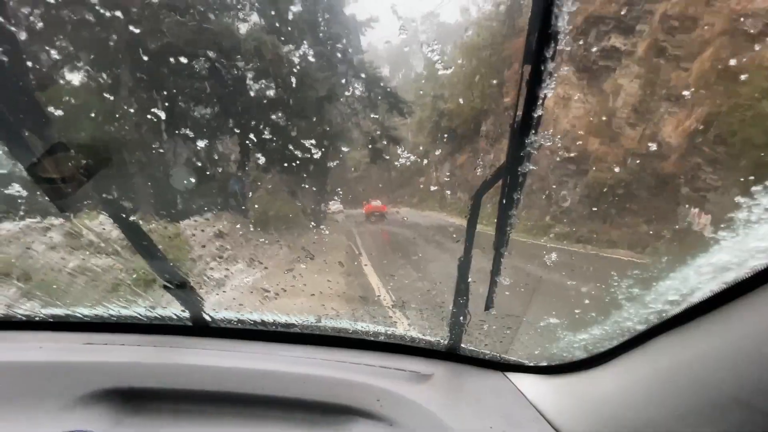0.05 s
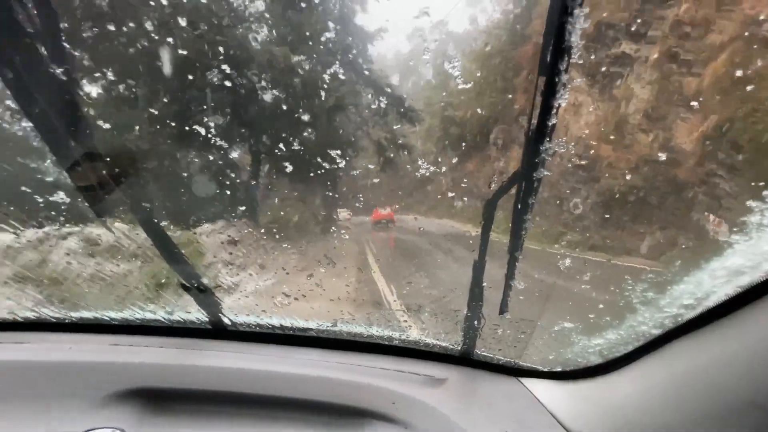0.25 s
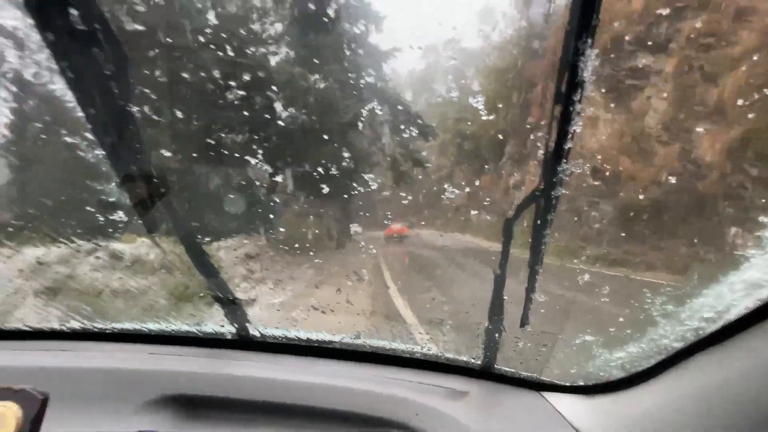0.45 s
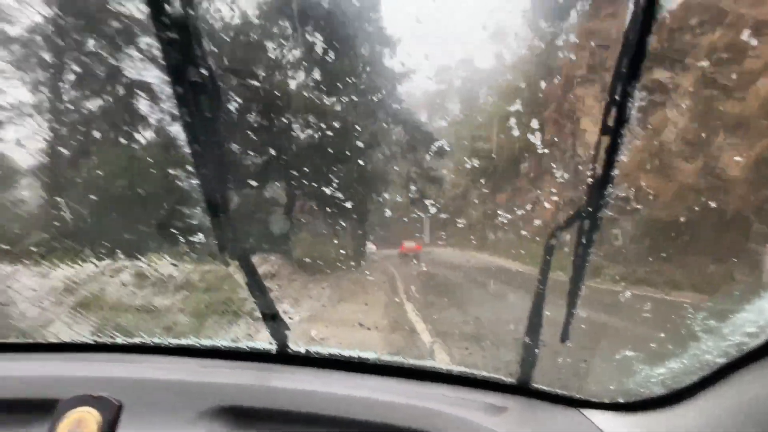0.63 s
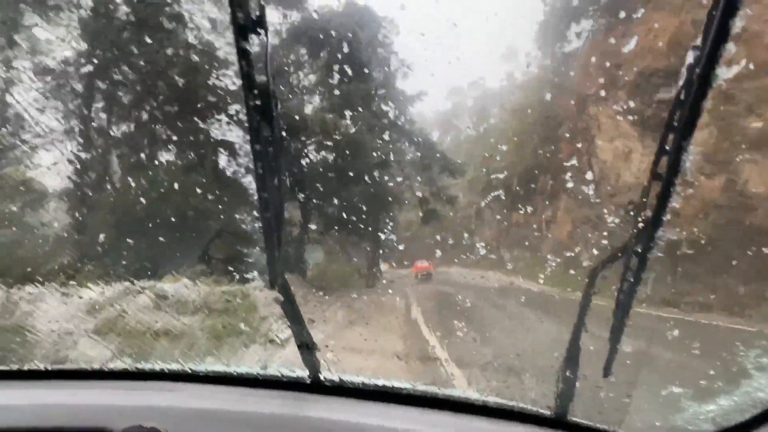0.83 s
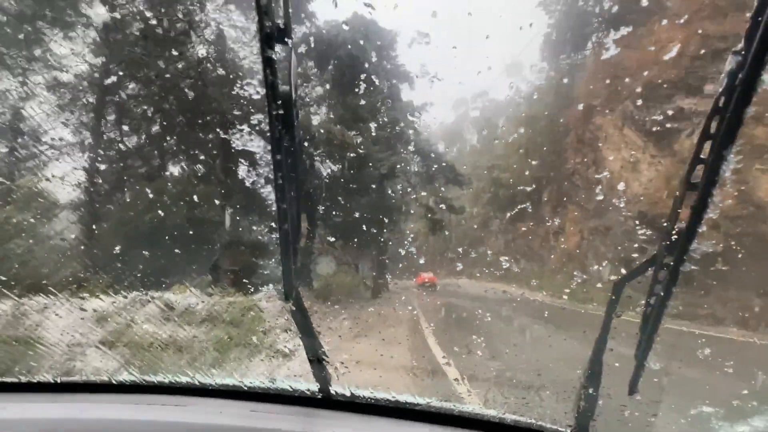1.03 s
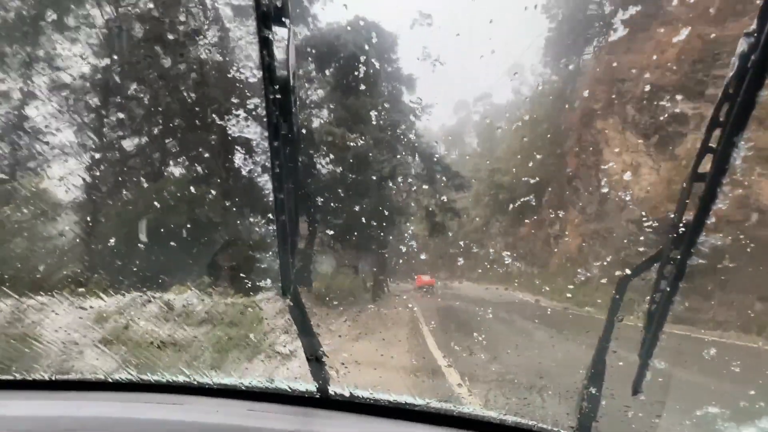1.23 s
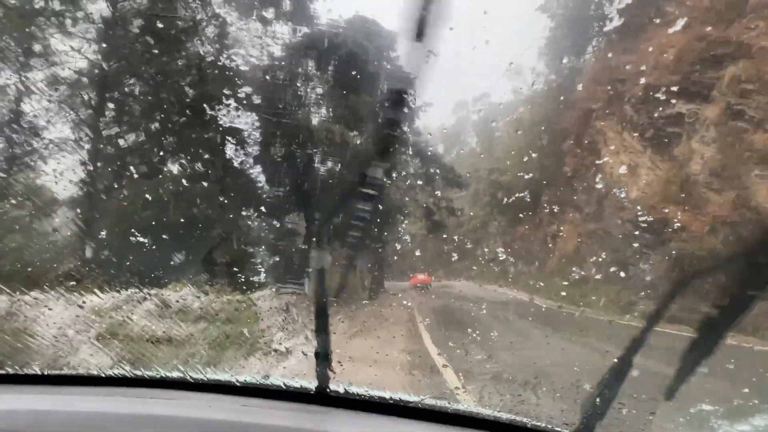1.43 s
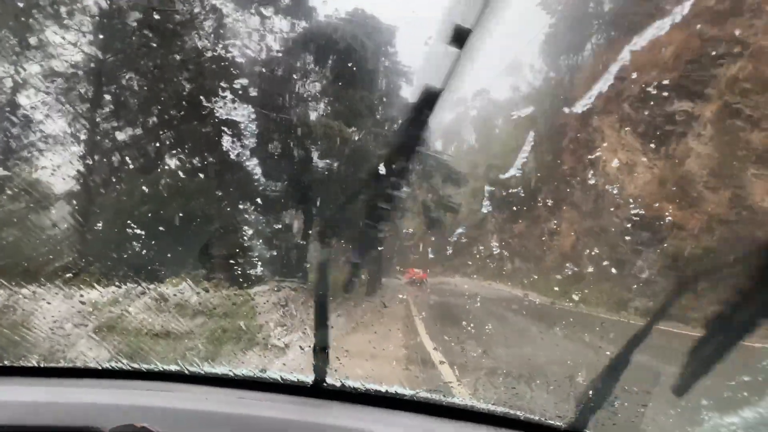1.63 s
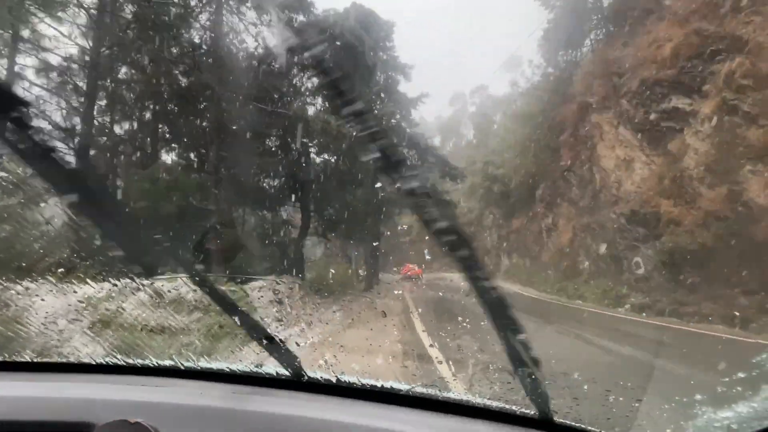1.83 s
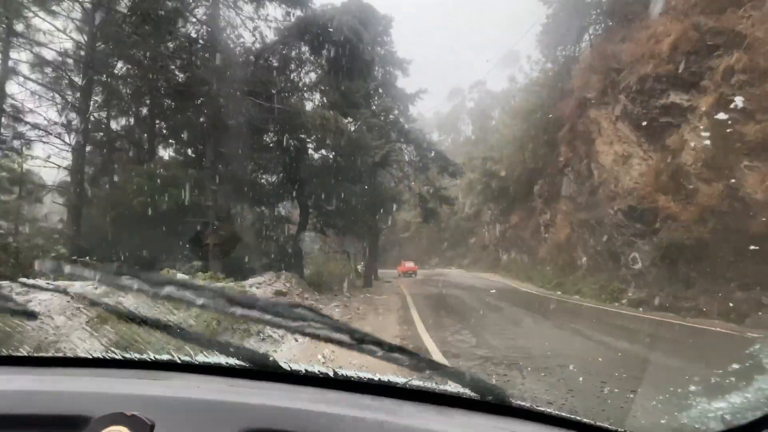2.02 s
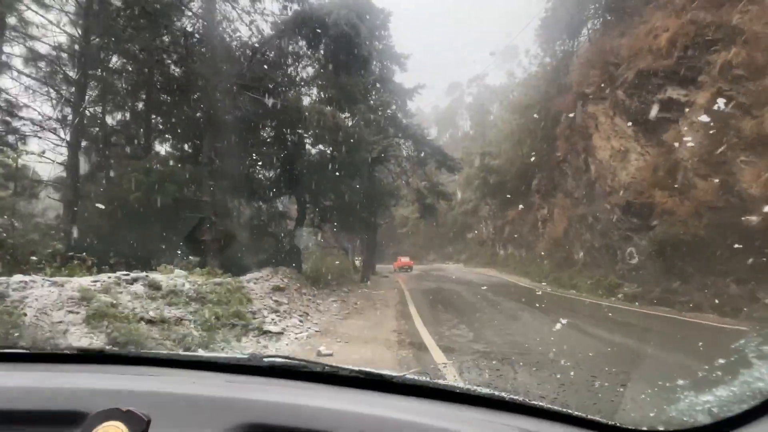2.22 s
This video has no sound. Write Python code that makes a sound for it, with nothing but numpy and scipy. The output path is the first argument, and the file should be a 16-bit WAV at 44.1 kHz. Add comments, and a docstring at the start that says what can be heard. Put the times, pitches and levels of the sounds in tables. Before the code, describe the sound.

A windshield wiper motor thuds on and whines through one sweep, ending in a heavy thump.

```python
"""Wiper sweep in a moving car

Bands of noise make the cabin floor and a wavering low tone with overtones makes the engine's hum.
A hand ticks on the trim and flicks the stalk: ringing modes and noise bursts, with grainy slides.
The wiper motor starts with thuds in the cowl and whines through one sweep, throbbing once a turn.
Rumble and hiss follow its linkage and blades, which land with a thump of short, low panel tones."""
import sys
import numpy as np
from scipy import signal
from scipy.fft import rfft, irfft
from scipy.io import wavfile

SR = 44100
rng = np.random.default_rng(int(sys.argv[2]) if len(sys.argv) > 2 else 0)


def persist_wave(psi):
    """Save psi, clipped to +-1, as 16-bit WAV."""
    counts = np.round(np.clip(psi, -1, 1) * 32767).astype(np.int16)
    wavfile.write(sys.argv[1], SR, np.atleast_2d(counts).T)


def magnitude_from_level(level_db):
    """Linear magnitude for a level in decibels (20 dB per decade)."""
    exponent = np.asarray(level_db, float) / 20
    return 10 ** exponent


N = 100062

# All levels in the tables are relative: the layers trim them further.
# cabin floor over time: start_s, bass_db, treble_db
FLOOR_LEVELS = [(0.0, -65.5, -70.5), (0.06, -55, -76), (0.23, -68.5, -75), (0.446, -67.5, -74),
                (0.7, -65, -77.5), (1.002, -75.5, -77), (1.124, -70, -78), (1.36, -74, -78)]
# colour of the road rumble: freq_hz, density_db (per Hz)
FLOOR_BASS_COLOUR = [(12, -58), (20, -11), (48, -4), (70, -3), (92, -14.5), (195, -16), (238, -23.5),
                     (420, -32), (500, -46), (650, -81), (1100, -120)]
# colour of the cabin hiss: freq_hz, density_db (per Hz)
FLOOR_TREBLE_COLOUR = [(180, 3), (300, -4.5), (484, -8.5), (550, -13), (698, -8), (873, -12), (1130, -11.5),
                       (1200, -11.5), (2420, -11), (5460, -22), (11700, -16.5), (13600, -26)]
# engine hum over time: start_s, pitch_hz, level_db
ENGINE_HUM = [(0.0, 61.2, -58), (0.09, 64.68, -45), (0.38, 64.86, -52.5), (0.5, 65.8, -51.5),
              (0.62, 64.34, -62), (0.7, 63.3, -52), (1.14, 65.4, -50.5), (1.2, 63.16, -63),
              (1.25, 62.9, -60.5), (1.3, 62.8, -50), (1.45, 62.97, -52), (1.58, 65.2, -39),
              (1.59, 61.7, -62), (1.62, 62.2, -38), (1.7, 54.9, -41), (1.84, 53.9, -48), (1.96, 62.8, -56),
              (2.03, 63.4, -51), (2.13, 57.4, -44), (2.15, 64.5, -54), (2.26, 61, -60)]
# engine overtones: multiple of the hum pitch, level_db
ENGINE_ORDERS = [(1, -4), (2, -17.5), (3, -26.5)]
# hand slides over the trim: start_s, length_s, level_db
HAND_SLIDES = [(0.282, 0.083, -70), (1.051, 0.032, -74), (1.513, 0.022, -49)]
# resonances of the sliding friction: freq_hz, width_hz, level_db
SLIDE_RESONANCES = [(1220, 450, -6), (3800, 700, -1), (6100, 390, 14), (6700, 500, -6), (8900, 400, -6),
                    (11100, 300, -14)]
# ticks on trim, stalk and linkage: start_s, ring_db, ring_centre_hz, knock_db, bite_db, sizzle_db
TICK_HITS = [(.002, -63, 490, -54.5, -69, -99), (0.029, -54, 420, -61.5, -71.5, -94),
             (.116, -58.5, 1310, -79, -73, -88), (0.28, -55, 1000, -79, -84, -90),
             (.286, -52.5, 1057, -97, -67, -67.5), (0.311, -59, 6200, -74, -66, -68),
             (.4495, -38, 920, -50.5, -60.5, -63.5), (0.466, -51, 10200, -57.5, -65, -77),
             (.478, -58, 800, -68, -81, -80), (.514, -56, 780, -66, -90, -75),
             (.6, -51.5, 1930, -64, -68, -84), (.613, -59, 1500, -68, -70, -81),
             (.627, -62, 2400, -79, -75, -74), (0.662, -57, 447, -65, -75, -77),
             (0.777, -75, 637, -75, -91, -91), (0.798, -63, 11500, -77, -95, -85),
             (0.842, -53.5, 740, -69, -96, -80), (1.052, -59, 1100, -66, -70, -73),
             (1.087, -42.5, 1810, -56, -73, -78), (1.343, -54, 1320, -52, -67, -72),
             (1.376, -38, 1290, -40.5, -44.5, -47), (1.38, -40, 900, -39.5, -45, -55.5),
             (1.383, -27, 805, -30.5, -41, -56), (1.454, -41, 1400, -37, -57, -82),
             (1.465, -39, 1180, -28.5, -37, -38), (1.471, -19.5, 1220, -29, -30.5, -35.5),
             (1.518, -50, 900, -53, -55, -56), (1.564, -49, 950, -37.5, -52, -91),
             (1.589, -50, 3000, -42, -47.5, -42.5), (1.755, -46.5, 2230, -53, -60, -61),
             (1.773, -43.5, 1150, -50, -63, -66), (1.819, -50.5, 11600, -61, -56, -57.5),
             (1.849, -58.5, 11570, -70, -67, -66), (1.909, -32, 3430, -52, -53, -58.5),
             (1.917, -41, 2280, -64, -69, -70), (2.084, -50, 1100, -63, -68, -74),
             (2.211, -45, 1100, -38, -56, -59), (2.219, -29.5, 1470, -32, -44, -54.5),
             (2.228, -48, 795, -34.5, -40, -53.5)]
# noise bands of a tick (knock, bite, sizzle): low_hz, high_hz, t60_s
TICK_NOISE_BANDS = [(220, 1600, 0.087), (2020, 4870, 0.067), (5700, 21800, 0.057)]
# colour of the tick noise: freq_hz, density_db (per Hz)
PLASTIC_COLOUR = [(200, 14), (450, 16), (800, 6.5), (1300, 3), (2100, 1.5), (2900, 3.5), (5600, -6),
                  (6500, 3), (7600, -3), (9000, 1.5), (10300, -6), (11800, 5), (14000, -27)]
# ringing modes of the trim: freq_hz, level_db, t60_s
TRIM_MODES = [(412, -3, 0.11), (719, -3.5, 0.091), (833, 0.5, 0.056), (1075, -8, 0.048),
              (1233, -1.5, 0.051), (1400, -2, 0.045), (1576, 2.5, 0.036), (2096, -1.5, .04),
              (2410, 1.5, 0.033), (2700, 1.5, 0.033), (3000, -18, 0.057), (3140, -5, 0.045),
              (3920, -3, 0.036), (5070, -1, 0.028), (6000, -3.5, 0.057), (6670, -2.5, .05),
              (10200, 2, 0.053), (11360, 6.5, 0.025)]
# running gear over time: start_s, cowl_rumble_db, blade_and_brush_hiss_db
GEAR_LEVELS = [(1.36, -53, -80), (1.376, -33, -82), (1.404, -25.5, -71), (1.43, -32.5, -59.5),
               (1.516, -29, -51), (1.56, -26.5, -56), (1.772, -48.5, -60.5), (1.792, -41, -58),
               (1.868, -50.5, -60.5), (1.92, -41, -57.5), (1.95, -42.5, -58.5), (2.192, -39.5, -55.5),
               (2.238, -27.5, -64.5), (2.26, -23, -51)]
# colour of the cowl rumble: freq_hz, density_db (per Hz)
RUMBLE_COLOUR = [(12, -51), (20, -22), (48, -12), (65, -4), (81, -6.5), (107, 0.5), (179, 1.5), (247, -4),
                 (360, -5.5), (470, -28), (790, -120)]
# colour of the blade and brush hiss: freq_hz, density_db (per Hz)
HISS_COLOUR = [(360, 5.5), (620, 0.5), (724, 2), (925, -7), (1000, -2), (1310, -6.5), (1590, -3.5),
               (1860, -12.5), (2960, -8.5), (3410, -16), (3830, -12.5), (4300, -29), (5020, -19.5),
               (5490, -39), (6090, -20), (7390, -28.5), (10300, -30.5), (11600, -22), (13600, -47)]
# thuds and short knocks in cowl and dashboard: start_s, peak_db, pitch_hz
PANEL_THUDS = [(0.001, -41.5, 143), (0.018, -42.5, 130), (0.045, -46.5, 123), (0.14, -55.5, 148),
               (0.172, -53, 138), (0.21, -57, 128), (0.286, -51.5, 1080), (0.4494, -40.5, 1140),
               (0.456, -38, 380), (0.465, -45.5, 195), (0.474, -45, 233), (0.487, -48, 173),
               (1.055, -62, 1030), (1.0855, -42.5, 1110), (1.089, -52.5, 149), (1.095, -55, 790),
               (1.345, -54, 372), (1.382, -27, 268), (1.386, -30, 517), (1.399, -26, 217),
               (1.414, -40, 144), (1.433, -32, 284), (1.449, -32.5, 185), (1.463, -30, 130),
               (1.4709, -21.5, 1330), (1.481, -30, 224), (1.515, -24, 210), (1.542, -20.5, 230),
               (1.552, -30, 298), (1.559, -21.5, 172), (1.577, -23.5, 150), (1.613, -45, 106),
               (1.633, -33, 166), (1.664, -35.5, 136), (1.781, -57, 159), (1.908, -38, 176),
               (2.04, -40.5, 202), (2.079, -37, 124), (2.115, -33, 180.2), (2.172, -33, 120),
               (2.2177, -20, 202), (2.2275, -26, 258), (2.2309, -17.5, 127), (2.2398, -9.5, 162),
               (2.259, -24, 162)]
# commutator whine pitch over time: start_s, pitch_hz
MOTOR_PITCH = [(1.46, 480), (1.5, 525), (1.55, 560), (1.6, 552), (1.63, 525), (1.66, 475), (1.69, 450),
               (1.75, 450), (1.79, 434), (1.88, 436), (1.95, 450), (2.0, 462), (2.06, 495), (2.12, 530),
               (2.18, 558), (2.22, 556), (2.27, 565)]
# whine loudness over time: start_s, level_db
WHINE_LEVELS = [(1.46, -58), (1.51, -52), (1.56, -41.5), (1.6, -45.5), (1.64, -47), (1.68, -48.5),
                (1.74, -44), (1.8, -45), (1.88, -44), (1.96, -44), (2.03, -52.5), (2.1, -48), (2.18, -45.5),
                (2.27, -42.5)]
# whine partials: multiple of the rotor's turn, level_db
ROTOR_ORDERS = [(3, -14.5), (4, -13), (5, -11), (12, -0.5), (24, -27), (36, -25)]
# housing tone near 400 Hz over time: start_s, pitch_hz, level_db
HOUSING_TONE = [(1.62, 410.2, -50), (1.658, 415, -45), (1.674, 416.6, -49), (1.782, 412.9, -49),
                (1.834, 393.8, -51), (1.992, 421, -48.5), (2.004, 409, -63), (2.032, 401.3, -50.5),
                (2.2, 401, -63)]
# stereo likeness by frequency: freq_hz, likeness (1 = both channels the same)
STEREO_LIKENESS = [(60, 0.82), (110, 0.81), (200, 0.77), (360, 0.59), (660, -0.36), (1200, 0.22),
                   (2180, -0.027), (3960, 0.18), (7210, -0.15), (13100, -0.15)]
# stereo balance by frequency: freq_hz, left_minus_right_db
STEREO_LEAN = [(60, 2.5), (150, 4.5), (360, 3), (890, 4), (2180, 0), (5340, 4), (13100, -2)]


def rms_one(x):
    """Scale to rms 1."""
    return x / np.sqrt(np.mean(x ** 2) + 1e-20)


def in_time(rows):
    """Glide each column of a table from point to point, one value per sample."""
    s, *columns = np.transpose(rows)
    return [np.interp(np.arange(N) / SR, s, c) for c in columns]


def at_hz(points, hz):
    """Read a spectrum table along a log frequency axis."""
    points = np.array(points)
    return np.interp(np.log(hz), np.log(points[:, 0]), points[:, 1])


def fade(seconds, length_s):
    """Straight ramp from 0 to 1 over length_s."""
    return np.clip(seconds / length_s, 0, 1)


def drift(rate_hz):
    """Random wander of rms 1: noise through two equal low-passes, drawn every 40 samples."""
    r = np.exp(-2 * np.pi * rate_hz * 40 / SR)
    noise = rng.standard_normal(N // 40 + 2002)
    slow = signal.lfilter([1], [1, -2 * r, r * r], noise)[2000:]  # drop the filter's settling
    return np.interp(np.arange(N) / 40, np.arange(len(slow)), rms_one(slow))


def coloured(spectrum, patchy_db, rate_hz):
    """Two noises shaped to one spectrum and set to rms 1, then flickering together in level."""
    hz = np.maximum(np.arange(N // 2 + 1) * SR / N, 1)
    inside = (hz >= spectrum[0][0]) * (hz <= spectrum[-1][0])
    shape = magnitude_from_level(at_hz(spectrum, hz)) * inside
    noise = irfft(rfft(rng.standard_normal((2, N))) * shape, N)
    return rms_one(noise) * magnitude_from_level(patchy_db * drift(rate_hz))


def stack(pitch_hz, orders):
    """Sines on multiples of a moving pitch; returns their sum and the phase of the pitch."""
    phase = 2 * np.pi * np.cumsum(pitch_hz) / SR
    tone = sum(np.sqrt(2) * magnitude_from_level(db) * np.sin(k * phase) for k, db in orders)
    return tone, phase


def place(mid, side):
    """Stereo from mid and side, with channel likeness and left-right lean set by frequency."""
    hz = np.maximum(np.arange(N // 2 + 1) * SR / N, 10)
    alike = np.clip(at_hz(STEREO_LIKENESS, hz), -0.9, 1)
    m = rfft(mid) * np.sqrt(1 + alike)
    s = rfft(side) * np.sqrt(1 - alike)
    lean = magnitude_from_level(at_hz(STEREO_LEAN, hz) / 2)  # half the difference on each channel
    return np.array([irfft((m + s) * lean, N), irfft((m - s) / lean, N)])


def cabin():
    """Road rumble and faint hiss: two coloured noises, the hiss flickering."""
    bass_db, treble_db = in_time(FLOOR_LEVELS)
    rumble = magnitude_from_level(bass_db + 6) * coloured(FLOOR_BASS_COLOUR, patchy_db=0, rate_hz=30)
    hiss = magnitude_from_level(treble_db + 3) * coloured(FLOOR_TREBLE_COLOUR, patchy_db=1, rate_hz=13)
    return rumble + hiss


def engine():
    """Engine hum: a low tone and two overtones, wavering in level."""
    pitch_hz, level_db = in_time(ENGINE_HUM)
    tone, _ = stack(pitch_hz, ENGINE_ORDERS)
    return tone * magnitude_from_level(level_db + 3 * drift(7.1))


def rubs():
    """Grainy friction noise in a few high resonances, sudden at first and fading over the slide."""
    t = np.arange(N) / SR
    noise, friction, slide = rng.standard_normal((2, N)), 0, 0
    for hz, width_hz, db in SLIDE_RESONANCES:
        r, w = np.exp(-np.pi * width_hz / SR), 2 * np.pi * hz / SR
        band = signal.lfilter([1 - r * r], [1, -2 * r * np.cos(w), r * r], noise)
        friction = friction + magnitude_from_level(db) * band
    for s, length, db in HAND_SLIDES:
        fall = np.clip(1 - (t - s) / length, 0, 1) ** 0.47
        slide = slide + magnitude_from_level(db) * fade(t - s, 0.0035) * fall
    return rms_one(friction) * slide * magnitude_from_level(3 * drift(64))


def tick_noise(rows, at):
    """Contact noise of the ticks: three bands that die at their own pace, with a fainter cabin tail."""
    rise_s, lift_db = 0.0012, -2
    tail_db, tail_t60_s = -18.5, 0.24
    plastic, out = coloured(PLASTIC_COLOUR, patchy_db=1, rate_hz=4), 0
    rise = np.exp(-1 / (rise_s * SR))
    for k, (low_hz, high_hz, t60) in enumerate(TICK_NOISE_BANDS):
        hits = np.full(N, 1e-18)  # tiny floor keeps the filters quick
        hits[at] = magnitude_from_level(rows[:, 3 + k] + lift_db)
        fall = signal.lfilter([1], [1, -magnitude_from_level(-60 / (t60 * SR))], hits)
        tail = signal.lfilter([1], [1, -magnitude_from_level(-60 / (tail_t60_s * SR))], hits)
        envelope = signal.lfilter([1 - rise], [1, -rise], fall + magnitude_from_level(tail_db) * tail)
        band = signal.butter(3, [low_hz, high_hz], "band", fs=SR, output="sos")
        out = out + envelope * rms_one(signal.sosfilt(band, plastic))
    return out


def tick_ring(rows, at):
    """Trim modes rung by soft contacts, each weaker the further it lies from the tick's centre."""
    ring_db, octave_loss_db = -10, 17.5  # loss one octave off centre, growing as octaves squared
    soft = np.exp(-1 / (0.00034 * SR))  # swell of a soft contact, 0.34 ms
    shape, out = (len(rows), len(TRIM_MODES), 2), 0
    chance_db = rng.normal(0, 0.86, shape)
    sign = rng.choice([-1, 1], shape) ** np.arange(2)  # random sign on the side signal only
    for k, (hz, db, t60) in enumerate(TRIM_MODES):
        octaves = np.log2(hz / rows[:, 2])
        level_db = rows[:, 1] + ring_db + db - octave_loss_db * octaves ** 2
        hits = np.full((2, N), 1e-18)
        hits[:, at] = (magnitude_from_level(level_db[:, None] + chance_db[:, k]) * sign[:, k]).T * (-1) ** k
        r, w = magnitude_from_level(-60 / (t60 * SR)), 2 * np.pi * hz / SR
        contact = np.array([1, 0, -1]) * (1 - soft * soft) / 2
        hits = signal.lfilter(contact, [1, -2 * soft * np.cos(w), soft * soft], hits)
        out = out + signal.lfilter([0, np.sin(w)], [1, -2 * r * np.cos(w), r * r], hits)
    return out


def ticks():
    """Each tick sprays short noise and rings the trim modes near its centre."""
    rows = np.array(TICK_HITS)
    at = (rows[:, 0] * SR).astype(int)
    return tick_noise(rows, at) + tick_ring(rows, at)


def gear():
    """Linkage rumble and rubber-on-glass hiss while the motor runs: two flickering noises."""
    rumble_db, hiss_db = in_time(GEAR_LEVELS)
    running = fade(np.arange(N) / SR - 1.378, 0.0034)
    rumble = magnitude_from_level(rumble_db - 5) * coloured(RUMBLE_COLOUR, patchy_db=1.5, rate_hz=18)
    hiss = magnitude_from_level(hiss_db + 4) * coloured(HISS_COLOUR, patchy_db=0.5, rate_hz=18)
    return running * (rumble + hiss)


def thuds():
    """A panel swells for about a cycle and dies in a few; the cabin booms after it."""
    decay_cycles = 5.85  # cycles in which the panel's exponential falls 60 dB
    boom_db, boom_hz, boom_t60_s = -24, 54, 0.21
    out, t = np.zeros(N + SR), np.arange(SR // 4) / SR
    boom = magnitude_from_level(boom_db - 60 * t / boom_t60_s) * np.sin(2 * np.pi * boom_hz * t)
    for s, db, hz in PANEL_THUDS:
        x = t * hz * np.log(1000) / decay_cycles
        panel = x * np.exp(1 - x) * np.sin(2 * np.pi * hz * t)
        out[int(s * SR):][:len(t)] += magnitude_from_level(db) * (panel + boom)
    return out[:N]


def housing():
    """The motor housing hums along: one jittery sine that fades in and out."""
    t = np.arange(N) / SR
    pitch_hz, level_db = in_time(HOUSING_TONE)
    tone, _ = stack(pitch_hz * (1 + 0.01 * drift(28.8)), [(1, 0)])
    window = fade(t - HOUSING_TONE[0][0], 0.023) * fade(HOUSING_TONE[-1][0] - t, 0.032)
    return tone * magnitude_from_level(level_db + 2.3 * drift(17)) * window


def whine():
    """Tones on multiples of the rotor's turn, the commutator's loudest, swelling once per turn."""
    bars = 12  # commutator bars passed in one turn
    (pitch_hz,), (level_db,) = in_time(MOTOR_PITCH), in_time(WHINE_LEVELS)
    tone, turn = stack(pitch_hz / bars * (1 + 0.01 * drift(43)), ROTOR_ORDERS)
    throb = 1 + 0.14 * np.sin(turn)
    start = fade(np.arange(N) / SR - MOTOR_PITCH[0][0], 0.04)
    return start * tone * throb * magnitude_from_level(level_db + 2.3 * drift(28))


def scene():
    """Noises and ticks spread as two signals; tones and thuds feed the side 130 samples late."""
    near = engine() + thuds() + whine() + housing()
    mid, side = cabin() + rubs() + ticks() + gear()
    return place(mid + near, side + np.roll(near, 130)) / np.sqrt(2)


def top_cut(x):
    """Nothing passes above the cut-off."""
    return signal.sosfilt(signal.butter(12, 13710, fs=SR, output="sos"), x)


def record(dry):
    """Hand on the finished mix."""
    return top_cut(dry)


dry = scene()
out = record(dry)
persist_wave(out)
```